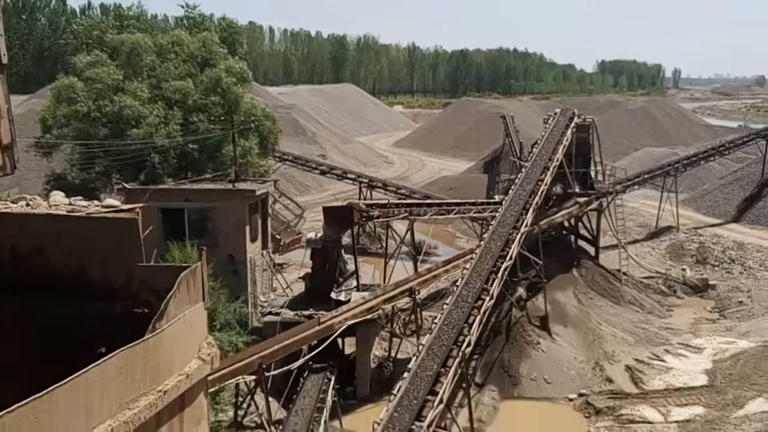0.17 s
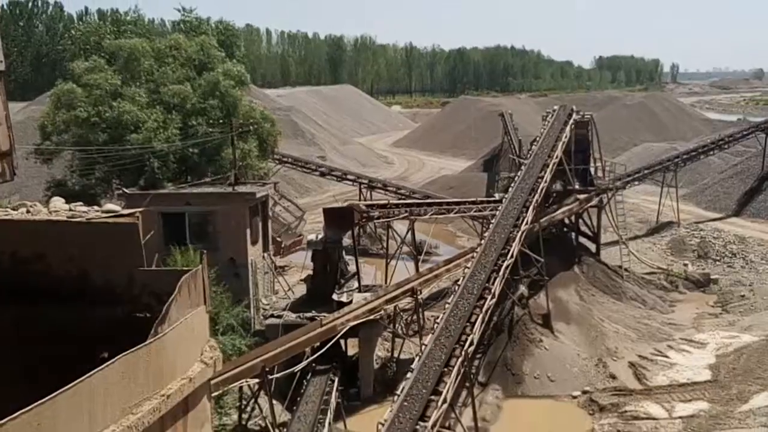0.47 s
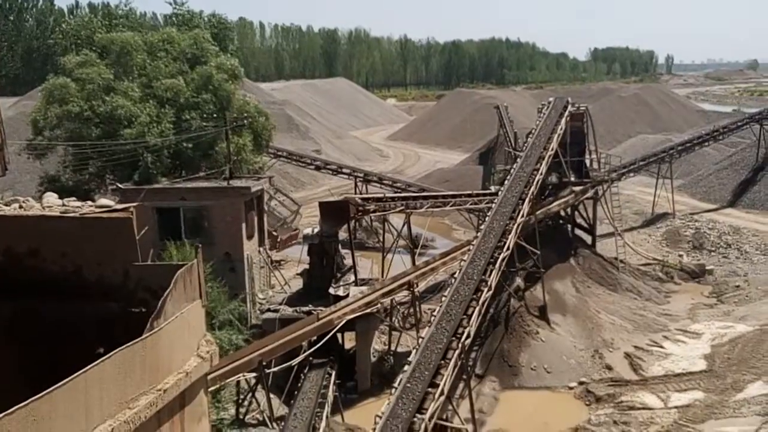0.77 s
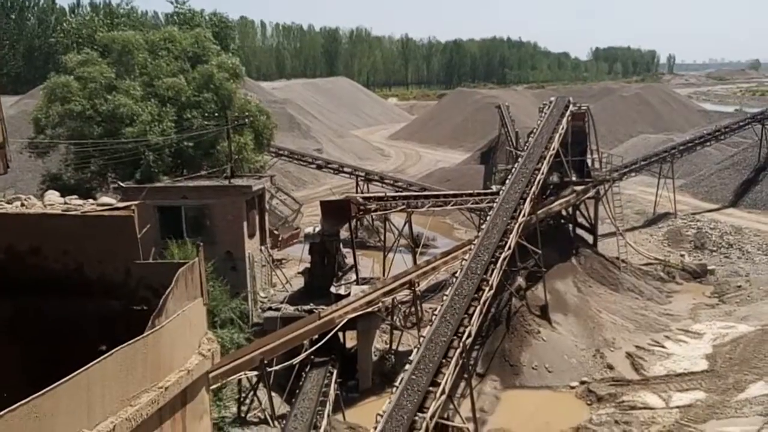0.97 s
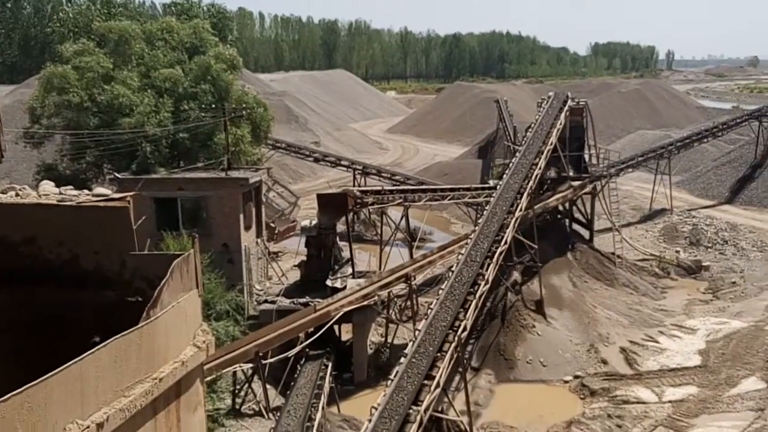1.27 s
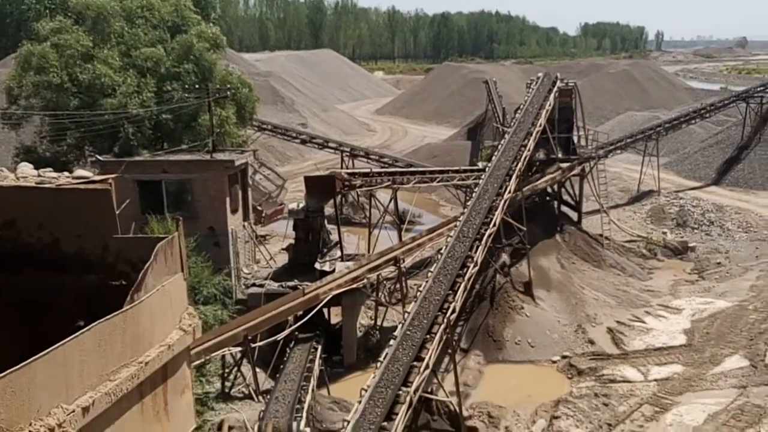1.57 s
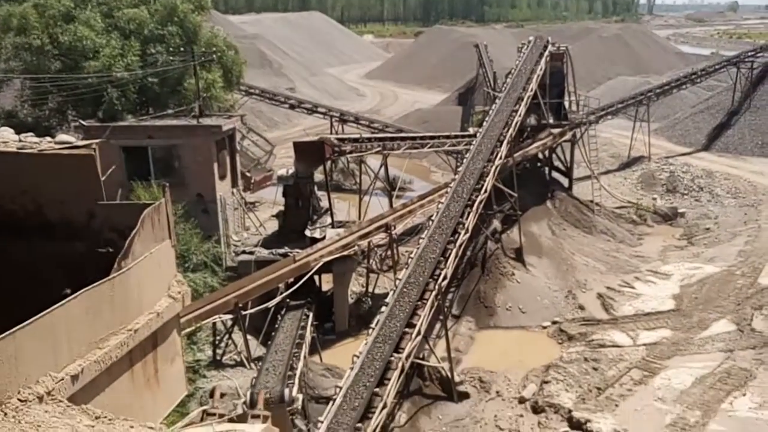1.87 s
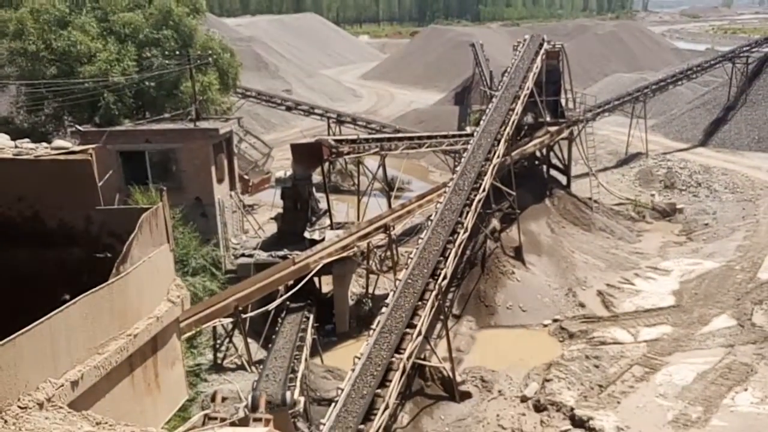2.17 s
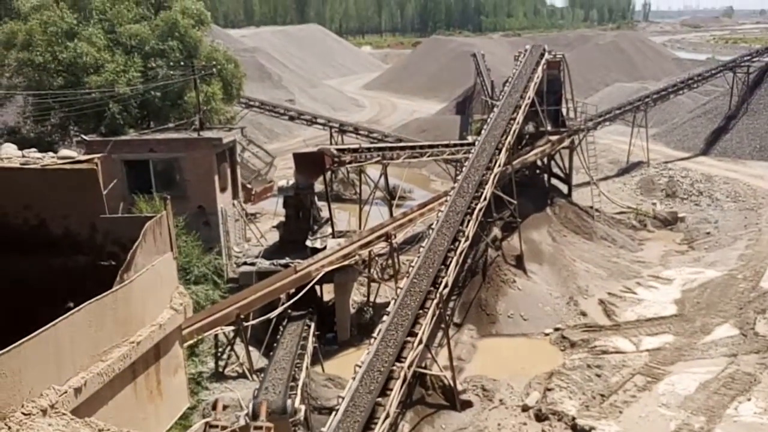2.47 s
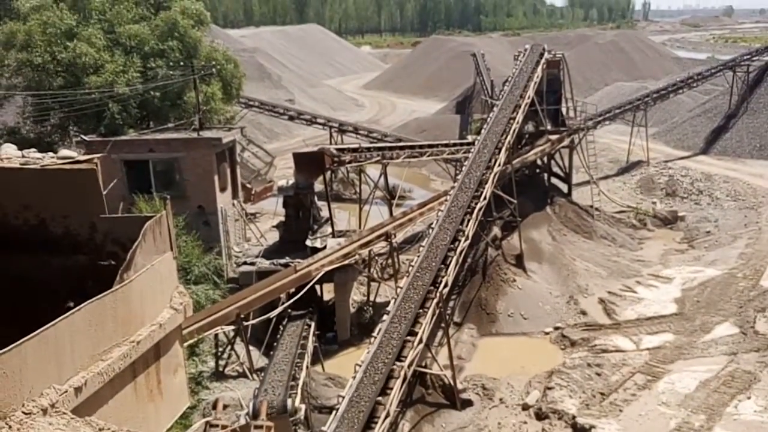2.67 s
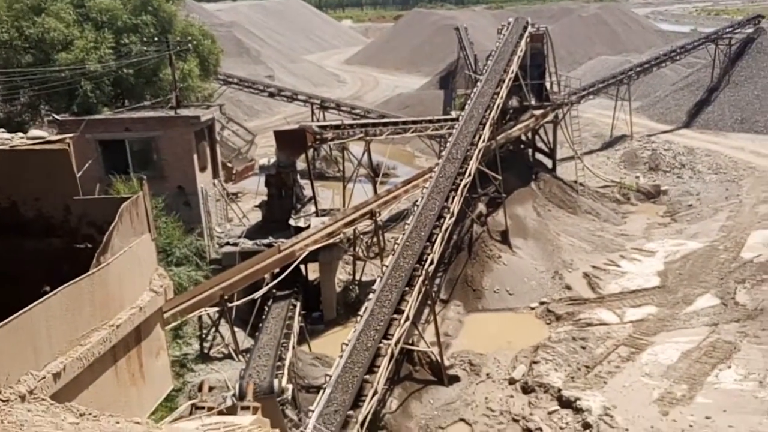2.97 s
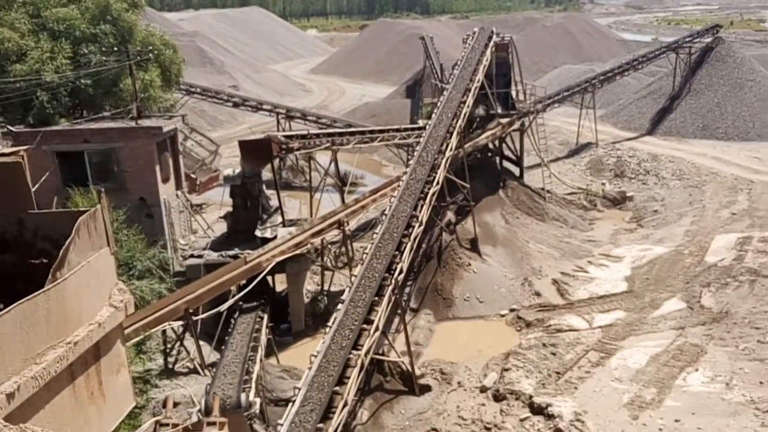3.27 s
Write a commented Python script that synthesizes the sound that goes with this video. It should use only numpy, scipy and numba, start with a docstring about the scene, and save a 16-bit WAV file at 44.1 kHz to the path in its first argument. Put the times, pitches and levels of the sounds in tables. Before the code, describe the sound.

Gravel plant roars without pause after a quick fade-in: stones rattle and ring on steel over rumbling belts and engine drone, outdoors, heard in wide stereo from a handheld microphone on a ledge.

```python
"""An outdoor gravel plant heard from a ledge by a slowly turning handheld camera; the sound fades in.
Stones pour and knock on steel without pause: shaped noise, ticks through resonances and short pitched rings.
Frames and belts rumble in low noise, with dull thuds as damped sines; engine and gear are wavering partials.
The clatter is spread in stereo: a resonance mostly left, a bright band mostly right,
and much of the treble in opposite phase."""
import sys
import numpy as np
from scipy import signal
from scipy.fft import rfft, irfft
from scipy.io import wavfile
from scipy.ndimage import uniform_filter1d
from numba import njit

SR = 44100
rng = np.random.default_rng(int(sys.argv[2]) if len(sys.argv) > 2 else 0)


def log_audio(samples):
    """Write samples as a 16-bit WAV file to the path given in sys.argv[1]."""
    # one column per channel
    frames = np.atleast_2d(samples).T
    # limit to full scale, then quantise
    limited = np.clip(frames, -1, 1)
    pcm = np.round(limited * 32767).astype(np.int16)
    wavfile.write(sys.argv[1], SR, pcm)


N = 151263

# big stones knocking on steel [t/s, level/dB before each layer's own offset, f/Hz]
KNOCKS = [(0.2582, -9, 2670), (0.3322, -9, 2660), (0.3395, -13, 3100), (0.4030, -12, 2570),
          (0.4255, -13, 2600), (0.4525, -14, 2680), (0.4745, -13, 2610), (0.4918, -9.5, 2640),
          (0.5303, -13, 2680), (0.7720, -12, 2790), (1.273, -14, 2730), (1.4182, -4, 2740),
          (1.5359, -15, 2600), (1.548, -15, 2800), (1.58, -14, 2650), (1.5935, -11, 2650),
          (2.1833, -14, 2650), (2.2235, -15, 2600), (2.5867, -13, 2440), (2.6689, -11, 2590),
          (2.9524, -9.5, 2510), (3.011, -11, 2310), (3.0284, -11.5, 2320), (3.042, -13, 2400),
          (3.0647, -12, 2470), (3.096, -14, 2400), (3.2172, -8, 2420)]
# resonance in front of the left microphone, moving as the camera turns
# [t/s, centre f/Hz, level/dB before channel gains and fade, width of each filter pass/Hz]
RESONANCE = [(0.3, 2630, -19, 430), (0.5, 2630, -18, 430), (0.82, 2700, -21, 480), (1.3, 2720, -20, 480),
             (1.62, 2700, -19.5, 520), (1.93, 2600, -21.5, 650), (2.22, 2640, -20.5, 650),
             (2.42, 2480, -21.5, 560), (2.65, 2500, -20.5, 560), (3.05, 2400, -19, 450),
             (3.4, 2416, -21.5, 480)]


def undb(db):
    """Decibels to amplitude."""
    return 10 ** (np.asarray(db) / 20)


def walk(rate):
    """Random levels held 1 / rate s and smoothed by two moving averages; spread near 1."""
    hold = int(SR / rate)
    steps = np.repeat(rng.standard_normal(N // hold + 1), hold)
    return 1.3 * uniform_filter1d(uniform_filter1d(steps, hold), hold)[:N]


def bursts(times, sizes, rise_s, t60_s):
    """Envelope that rises quickly at each blow and dies away exponentially."""
    index = np.clip((np.asarray(times) * SR).astype(int), 0, N - 1)
    kicks = np.bincount(index, sizes, N)
    fall = np.exp(-np.log(1000) / (t60_s * SR))
    rise = np.exp(-1 / (max(rise_s, 1e-4) * SR))
    decays = signal.lfilter([1], [1, -fall], kicks)
    return signal.lfilter([1 - rise], [1, -rise], decays)


def flow(swell_db, knock_db, knock_t60_s):
    """Level of the gravel stream: a steady pour, random stones, the big knocks."""
    stones_per_s, stone_db, stone_spread_db, stone_t60_s = 200, -9.5, 1.8, 0.03
    rise_s = 0.00068
    when, luck = rng.random((int(stones_per_s * N / SR), 2)).T
    # exponential spread in dB: many small stones, few large ones
    sizes = undb(stone_db - stone_spread_db * np.log(1 - luck))
    stones = bursts(when * N / SR, sizes, rise_s, stone_t60_s)
    pour = undb(swell_db) * np.sqrt(1 + stones ** 2)
    s, db, _ = np.array(KNOCKS).T
    knocks = bursts(s, undb(db + knock_db), rise_s, knock_t60_s)
    return np.hypot(pour / np.sqrt(np.mean(pour ** 2)), knocks)  # knocks stand over a pour of rms 1


def colour(x, table):
    """Shape noise by spectrum points; unit white noise gets exactly their density in dB per Hz."""
    hz, db = np.array(table).T
    f = np.maximum(np.arange(N // 2 + 1) * SR / N, 1)
    density_db = np.interp(np.log(f), np.log(hz), db, right=-150)
    gain = undb(density_db) * np.sqrt(SR / 2)
    return irfft(rfft(x) * gain, N)


def roar(table, stream):
    """Noise of frames, belts and gravel: the bass flickers, the treble follows the stream."""
    clatter_from_hz, rumble_flicker_db, clatter_flicker_db = 464, 1.5, 1.0
    sos = signal.butter(2, clatter_from_hz, fs=SR, output="sos")
    rumble = signal.sosfiltfilt(sos, rng.standard_normal(N)) * undb(rumble_flicker_db * walk(25.2))
    stones = rng.standard_normal(N) * stream * undb(clatter_flicker_db * walk(15))
    clatter = stones - signal.sosfiltfilt(sos, stones)  # keep only what lies above the rumble
    return colour(rumble + clatter, table)


def pebbles():
    """Pebbles ticking on steel: dense single impulses of uneven size and random sign."""
    per_s, spread_db, rms_db = 500, 2.2, -4  # rms before the surge of the pour
    when, luck, coin = rng.random((int(per_s * N / SR), 3)).T
    sizes = np.sign(coin - .5) * undb(-spread_db * np.log(1 - luck))
    ticks = np.bincount((when * N).astype(int), sizes, N)
    return undb(rms_db) * ticks / ticks.std()


@njit
def svf(x, hz, width, sr):
    """Band-pass with a moving centre and width, gain 1 at the centre."""
    y, b, l = np.empty(len(x)), 0., 0.  # b, l: memories of the band and low integrators
    for i in range(len(x)):
        g, k = np.tan(np.pi * hz[i] / sr), width[i] / hz[i]
        v = (b + g * (x[i] - l)) / (1 + g * (g + k))
        b, l, y[i] = 2 * v - b, l + 2 * g * v, k * v
    return y


def band(stream, table, ratio, width_hz, t, ticks=0):
    """The gravel stream through a moving, slightly wavering resonance."""
    centre_waver, patchy_db = 0.012, 1.0  # each band swells on its own
    s, hz, db = np.array(table).T[:3]
    centre = ratio * np.interp(t, s, hz) * (1 + centre_waver * walk(30))
    width = width_hz * np.ones(N)
    strike = rng.standard_normal(N) * stream + ticks
    once = svf(strike, centre, width, 1. * SR)
    ring = svf(once, centre, width, 1. * SR) / np.sqrt(width)  # even loudness as the width moves
    return ring / ring.std() * undb(np.interp(t, s, db) + patchy_db * walk(10))


def clanks(t):
    """Pitched core of the knocks: each is a damped sine at its own pitch with a soft onset."""
    offset_db, rise_s, t60_s = 13, 0.0015, 0.018
    out = 0
    for s, db, hz in KNOCKS:
        age = np.maximum(t - s, 0)
        envelope = (1 - np.exp(-age / rise_s)) * np.exp(-np.log(1000) * age / t60_s)
        out = out + undb(db + offset_db) * envelope * np.sin(2 * np.pi * hz * age)
    return out


def thuds(t):
    """Dull thuds in the frame: short damped low sines."""
    # blows [t/s, starting level/dB before the fade, f/Hz]
    thud_table = [(1.299, -21.5, 144), (1.501, -11, 178), (1.534, -16, 141), (2.208, -15, 144),
                  (3.31, -13.5, 193)]
    t60_s = 0.077
    out = 0
    for s, db, hz in thud_table:
        age = np.maximum(t - s, 0)
        out = out + undb(db) * np.sin(2 * np.pi * hz * age) * 1000. ** (-age / t60_s)
    return out


def tones(hz, rows, waver, walk_db):
    """Multiples of one wavering rotation, each swelling on its own."""
    phase = 2 * np.pi * np.cumsum(hz * (1 + waver * walk(2.982))) / SR
    out = 0
    for multiple, rms_db in rows:
        level = np.sqrt(2) * undb(rms_db + walk_db * walk(4.18))
        out = out + level * np.sin(multiple * phase + rng.uniform(0, 2 * np.pi))
    return out


def machines(t):
    """Engine drone, gear whine and other hums as sums of wavering sines."""
    # engine partials [multiple, rms level/dB before load and swell]
    engine = [(1, -43), (2, -41), (3, -26.5), (4, -41), (5, -37.5), (6, -40)]
    # gear partials [multiple, rms level/dB before load and swell]
    gear = [(1, -37), (3, -51), (4, -53), (6, -49)]
    # other hums [f/Hz, rms level/dB before swell, waver as a share of f]
    hum_table = [(14.8, -47, .003), (59.5, -39, .03), (398.4, -41, .001)]
    # machine levels [t/s, drone change/dB, whine change/dB, whine octave rms level/dB before swell]
    load = [(.3, 0, -3, -46), (.55, 2, -1, -41), (.8, 2, -1, -44), (1.1, 1, -1, -40), (1.32, 2, 6, -39),
            (1.5, 1, 2, -38), (1.65, -2, -3, -43), (2.1, 1, 0, -42), (2.55, -2, -1, -38), (2.8, 2, 5, -42),
            (3.0, 2, -2, -40), (3.3, 2, 4, -41)]
    engine_hz, engine_waver, engine_walk_db = 38.5, 0.0015, 1.2
    gear_hz, gear_waver, gear_walk_db = 421.2, 0.0006, 1.4
    s, drone_db, whine_db, octave_db = np.array(load).T
    drone = tones(engine_hz, engine, engine_waver, engine_walk_db) * undb(np.interp(t, s, drone_db))
    whine = tones(gear_hz, gear, gear_waver, gear_walk_db) * undb(np.interp(t, s, whine_db))
    octave = tones(2 * gear_hz, [(1, np.interp(t, s, octave_db))], gear_waver, gear_walk_db)
    hums = sum(tones(hz, [(1, db)], waver, gear_walk_db) for hz, db, waver in hum_table)
    return drone + whine + octave + hums


def scene():
    """Mid and side roar, machines in the middle, one resonance mostly left, a bright band mostly right."""
    # flow of gravel [t/s, level/dB]
    pour_table = [(.3, 0), (1.4, 0), (2.1, 1), (2.4, 0), (2.65, 1), (2.85, 0), (3.4, 1)]
    # noise alike in both channels [f/Hz, density for unit white noise/dB per Hz]
    roar_mid = [(20, -67.5), (35, -64.5), (52, -50.5), (90, -50.5), (140, -52.5), (240, -53.5), (320, -50),
                (440, -52), (580, -68), (800, -60.5), (1100, -63), (1450, -68.5), (1900, -61), (2900, -67),
                (3800, -64), (5600, -64), (6400, -70.5), (7000, -91)]
    # noise in opposite phase left and right [f/Hz, density for unit white noise/dB per Hz]
    roar_side = [(30, -76), (120, -64.5), (400, -72), (600, -78.5), (1200, -77.5), (1900, -74), (2900, -67),
                 (3800, -57.5), (5400, -57.5), (6400, -61.5), (6900, -72.5), (7700, -84.5), (11000, -83),
                 (13000, -90), (15000, -99)]
    # bright band on the right, fading as the camera turns [t/s, centre f/Hz, level/dB before the fade-in]
    bright_table = [(.3, 5200, -29.5), (1.2, 5200, -29.5), (2.0, 5000, -32), (2.65, 4900, -31),
                    (3.0, 4200, -33), (3.4, 4100, -33)]
    # bright band on the left, rising as the camera turns
    # [t/s, centre f/Hz before a slight lowering, level/dB before the fade-in]
    sheen_table = [(.3, 5620, -46), (1.5, 5600, -38), (2.399, 5840, -36.5), (3.0, 6170, -36),
                   (3.4, 6120, -35)]
    t = np.arange(N) / SR

    surge_db = 0.5 * walk(8) + np.interp(t, *np.array(pour_table).T)
    stream = flow(surge_db, knock_db=12.5, knock_t60_s=0.067)
    near = flow(surge_db, knock_db=9, knock_t60_s=0.09)  # longer noisy knocks for the resonance
    ticks = pebbles() * undb(surge_db)

    mid = roar(roar_mid, stream) + machines(t) + thuds(t)
    side = roar(roar_side, stream)
    width_hz = np.interp(t, *np.array(RESONANCE).T[::3])
    ring = band(near, RESONANCE, 1, width_hz, t, ticks) + clanks(t)
    # band above the resonance, inverted on the right
    shoulder = undb(-5.3) * band(near, RESONANCE, ratio=1.157, width_hz=650, t=t, ticks=ticks)
    bright = band(stream, bright_table, ratio=1, width_hz=1300, t=t)
    sheen = band(stream, sheen_table, ratio=0.99, width_hz=800, t=t)

    left = mid + side + ring + shoulder + sheen - undb(-8) * bright
    right = mid - side + undb(-12) * ring - undb(-15) * shoulder + bright
    return np.array([left, right])


def record(dry):
    """Fade in, clip at full scale; what both channels share ends lower than their difference."""
    # fade-in, holding its last level [t/s, level/dB]
    fade_table = [(.043, -62), (0.049, -21.5), (.07, -15.5), (.14, -9), (.26, -4.5), (.34, -2.5)]
    mid_top_hz, top_hz = 7100, 15400
    s, db = np.array(fade_table).T
    fade = undb(np.interp(np.arange(N) / SR, s, db, left=-90))
    left, right = np.clip(dry * fade, -1, 1)
    mid_sos = signal.ellip(8, .1, 40, mid_top_hz, fs=SR, output="sos")
    mid = signal.sosfiltfilt(mid_sos, (left + right) / 2, padtype="even", padlen=2000)
    side = (left - right) / 2
    top_sos = signal.ellip(8, .2, 70, top_hz, fs=SR, output="sos")
    return signal.sosfilt(top_sos, [mid + side, mid - side])


dry = scene()
out = record(dry)
log_audio(out)
```